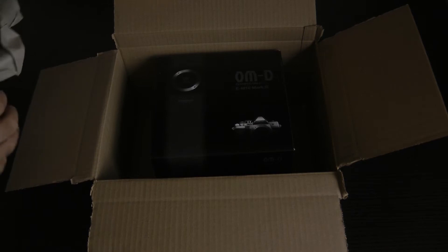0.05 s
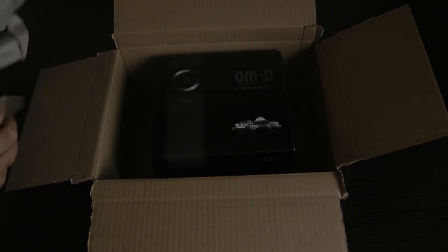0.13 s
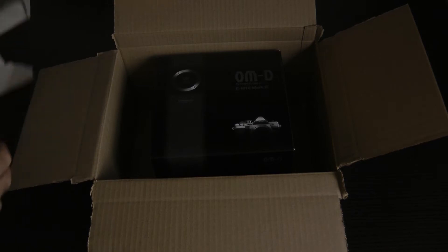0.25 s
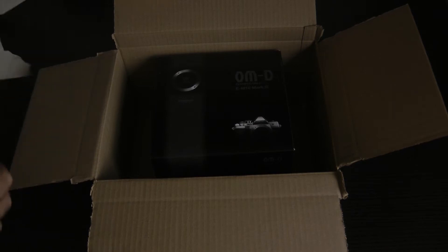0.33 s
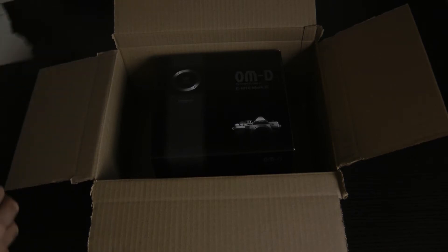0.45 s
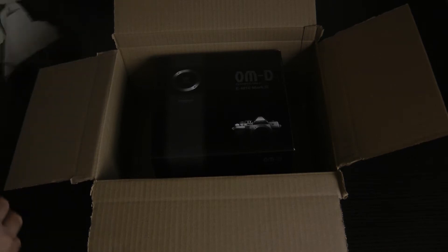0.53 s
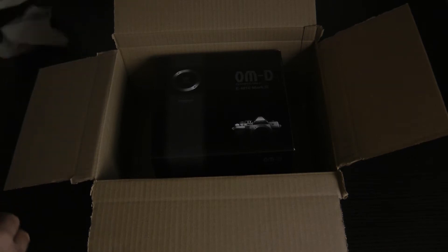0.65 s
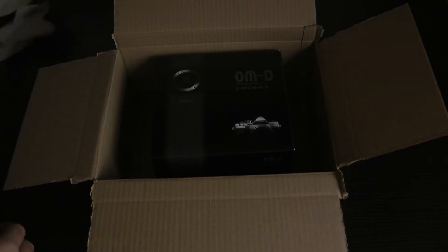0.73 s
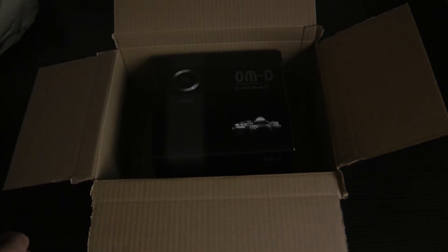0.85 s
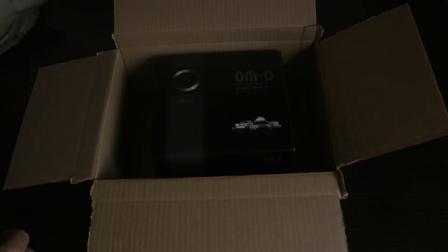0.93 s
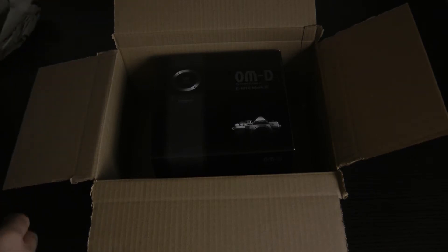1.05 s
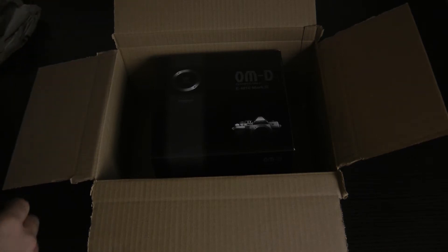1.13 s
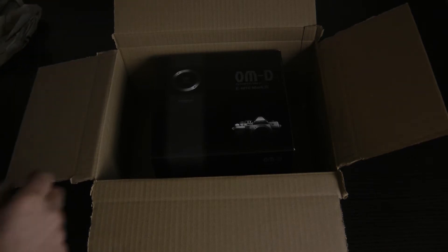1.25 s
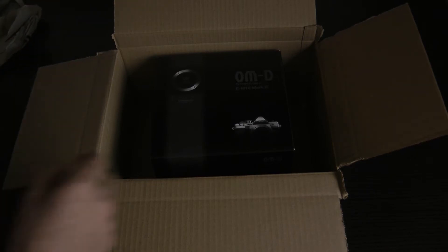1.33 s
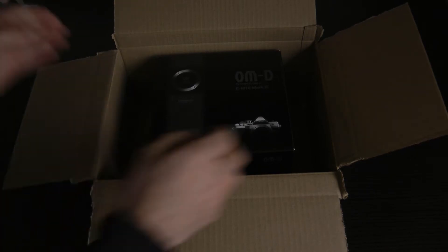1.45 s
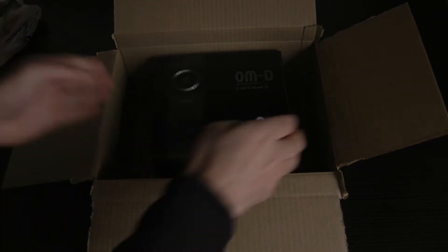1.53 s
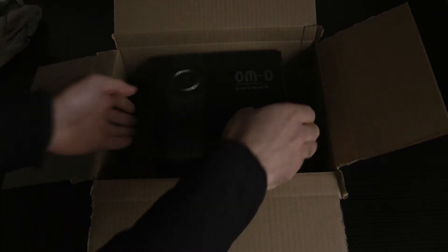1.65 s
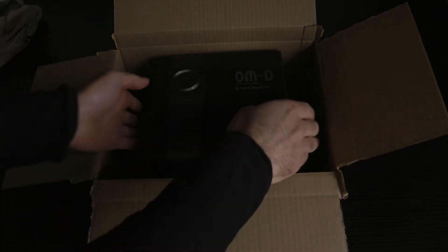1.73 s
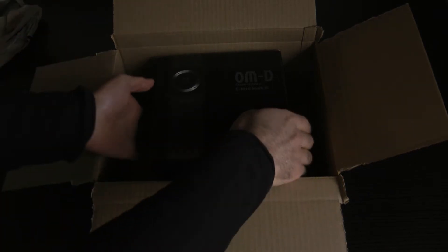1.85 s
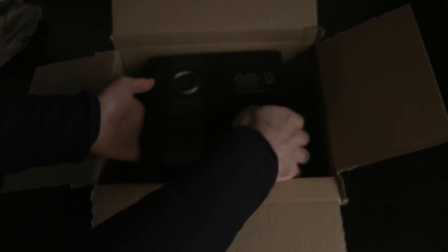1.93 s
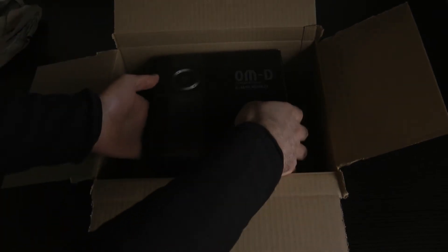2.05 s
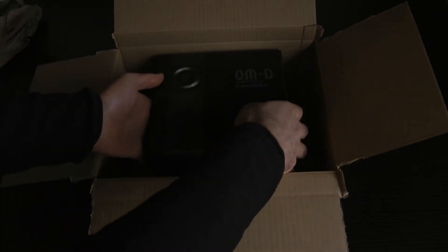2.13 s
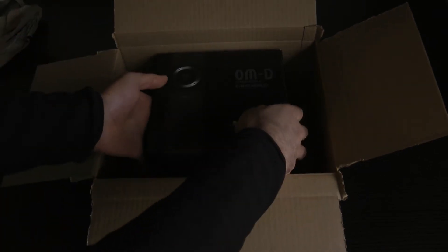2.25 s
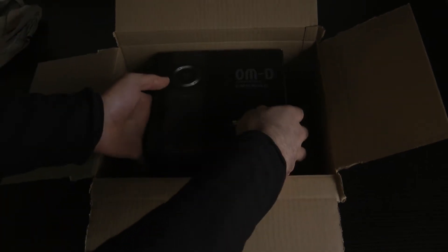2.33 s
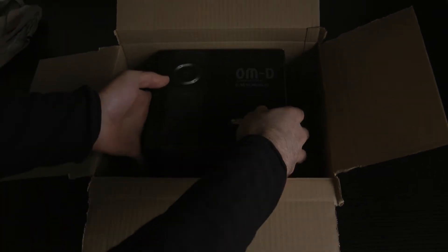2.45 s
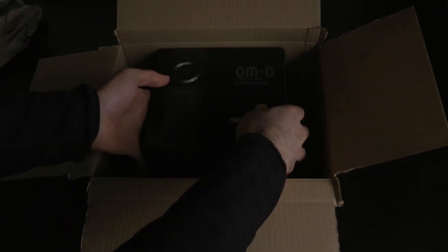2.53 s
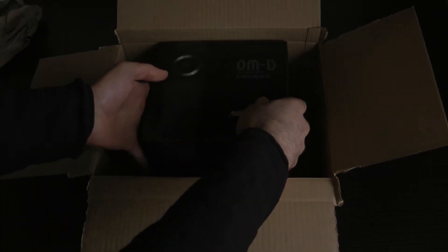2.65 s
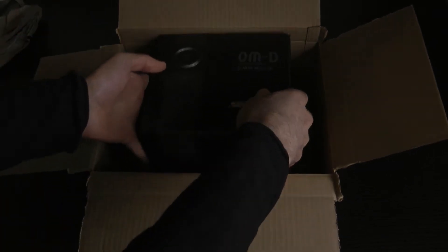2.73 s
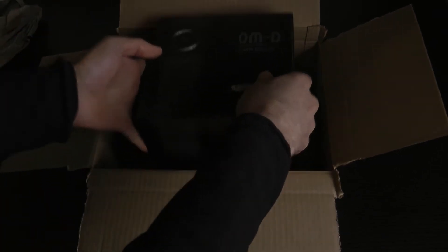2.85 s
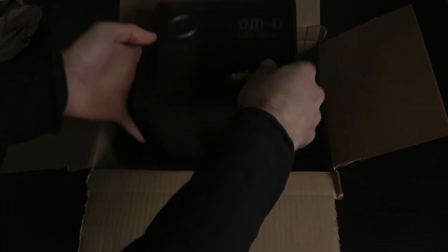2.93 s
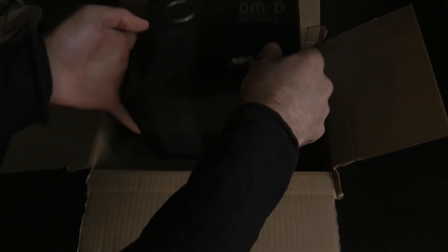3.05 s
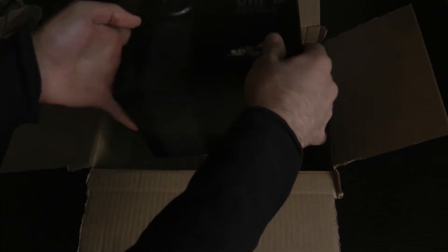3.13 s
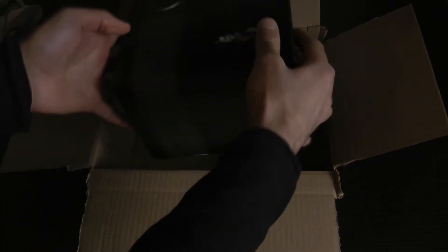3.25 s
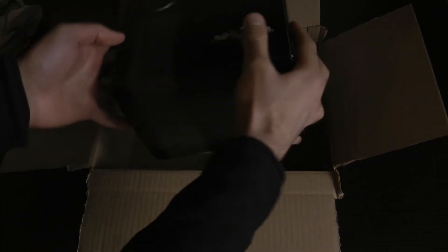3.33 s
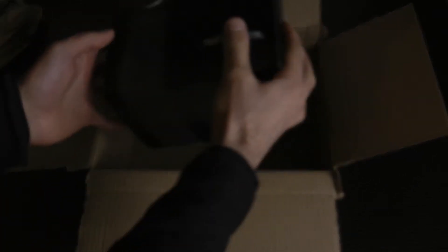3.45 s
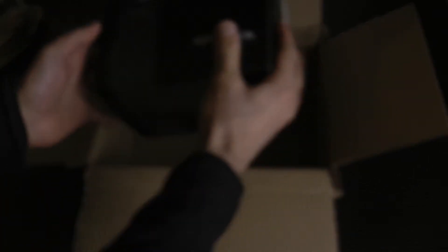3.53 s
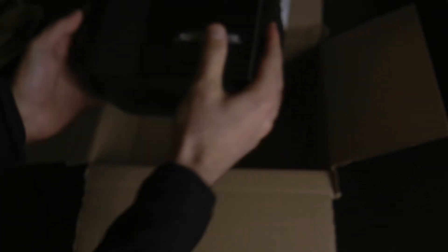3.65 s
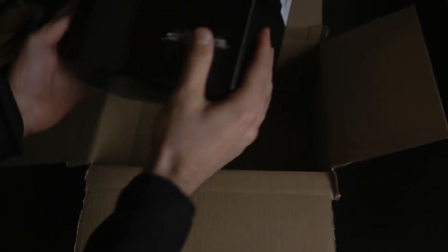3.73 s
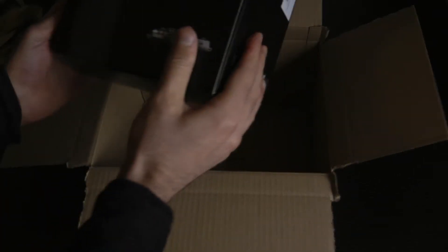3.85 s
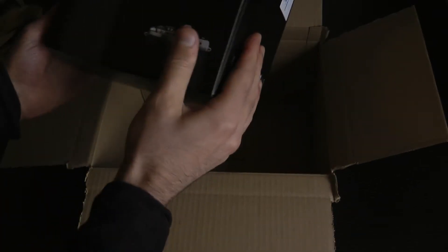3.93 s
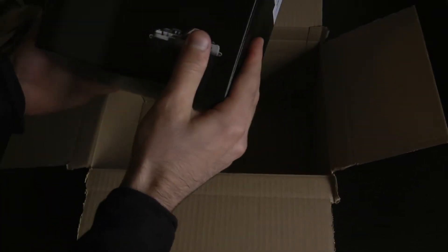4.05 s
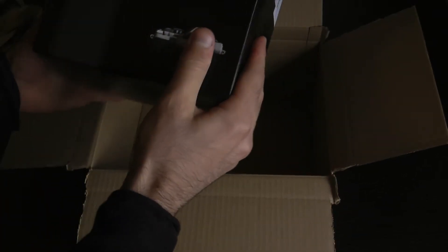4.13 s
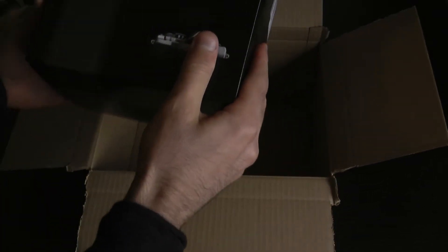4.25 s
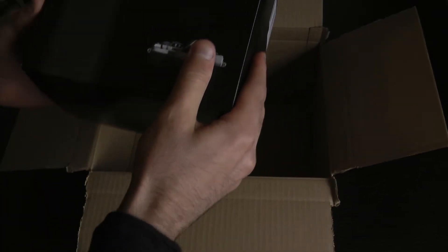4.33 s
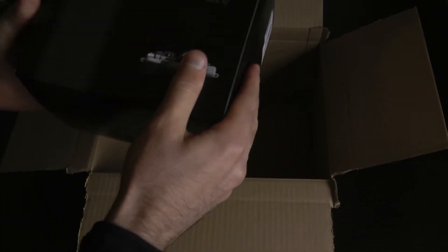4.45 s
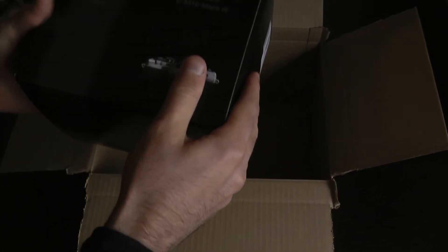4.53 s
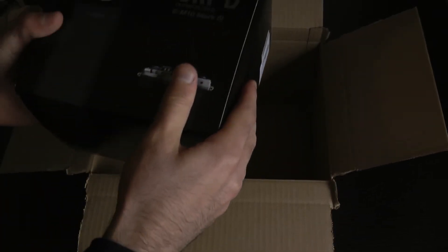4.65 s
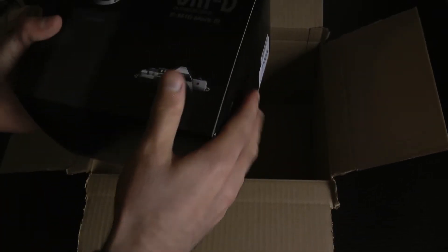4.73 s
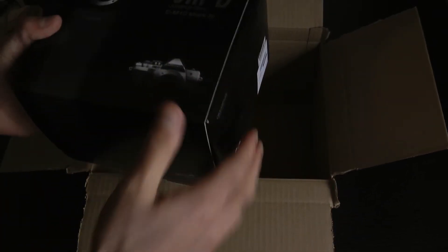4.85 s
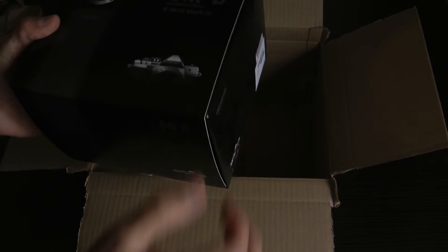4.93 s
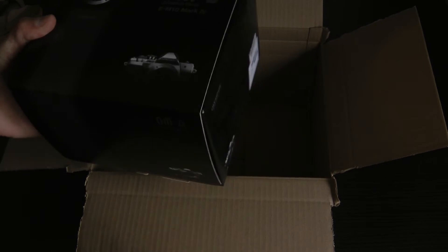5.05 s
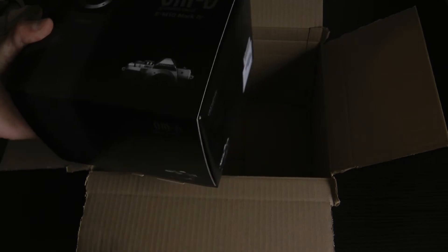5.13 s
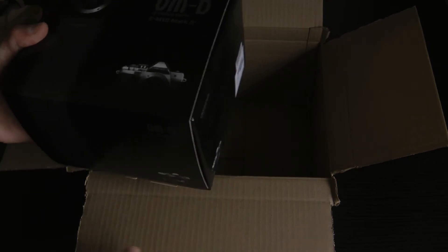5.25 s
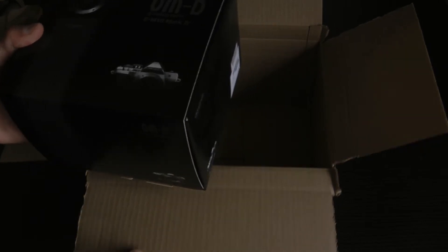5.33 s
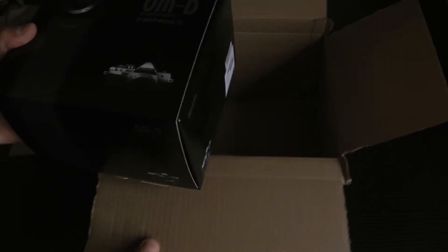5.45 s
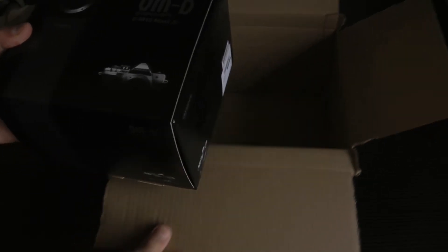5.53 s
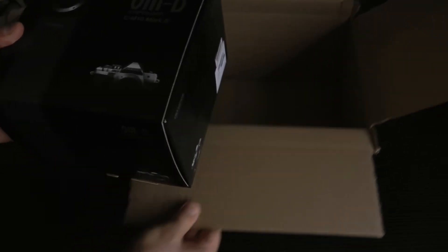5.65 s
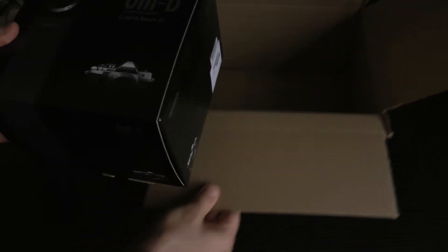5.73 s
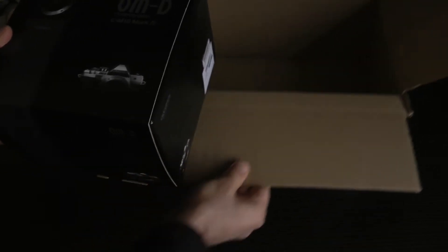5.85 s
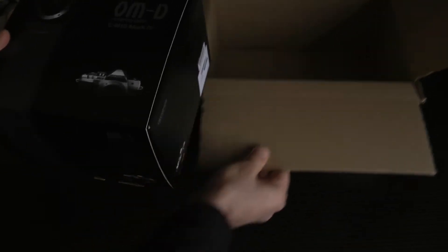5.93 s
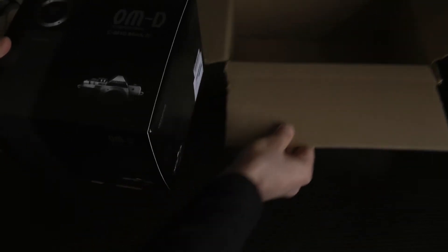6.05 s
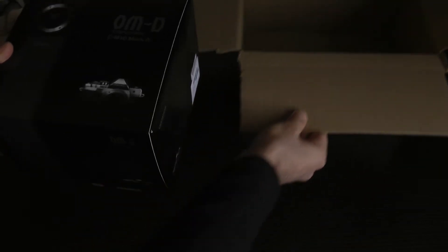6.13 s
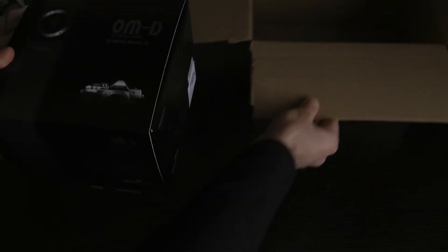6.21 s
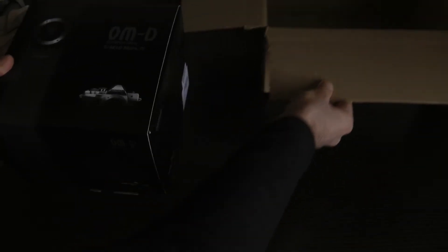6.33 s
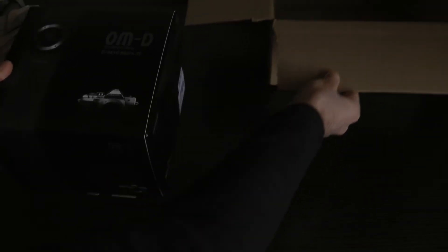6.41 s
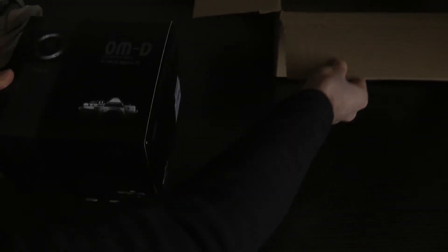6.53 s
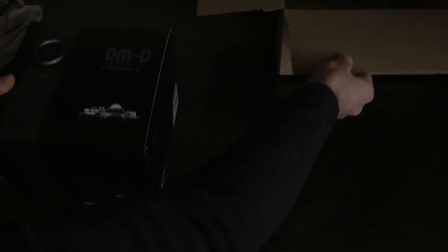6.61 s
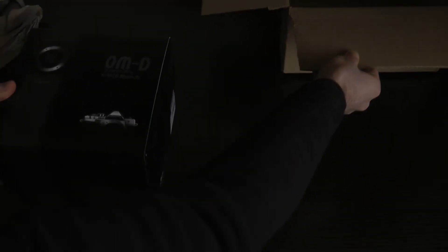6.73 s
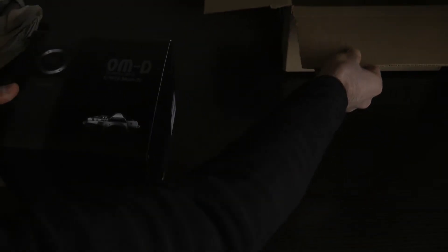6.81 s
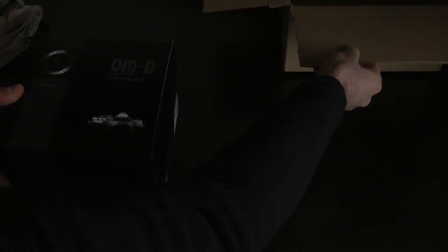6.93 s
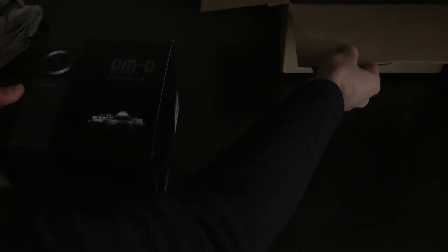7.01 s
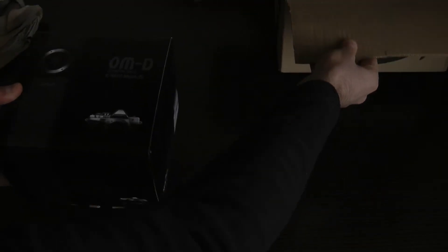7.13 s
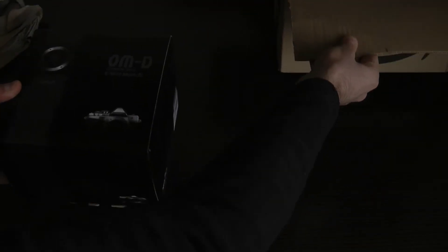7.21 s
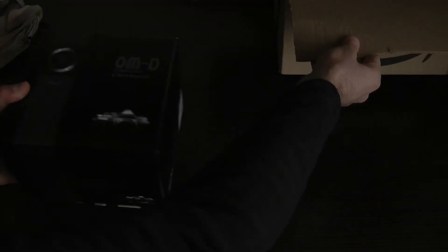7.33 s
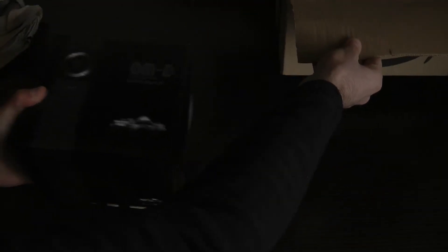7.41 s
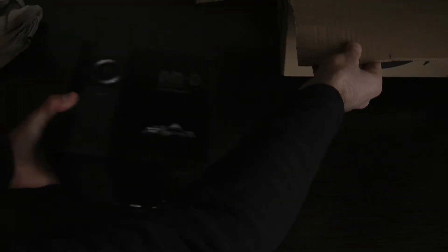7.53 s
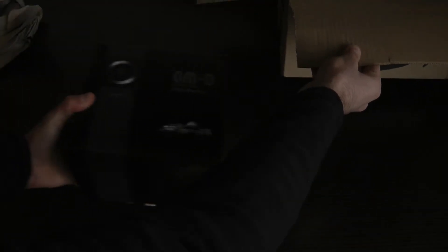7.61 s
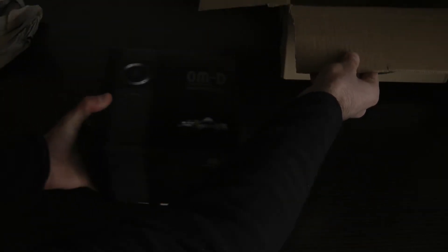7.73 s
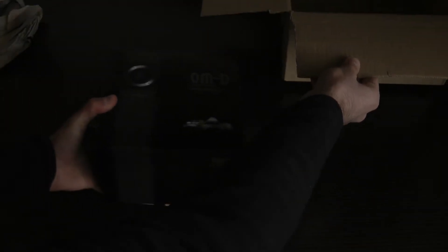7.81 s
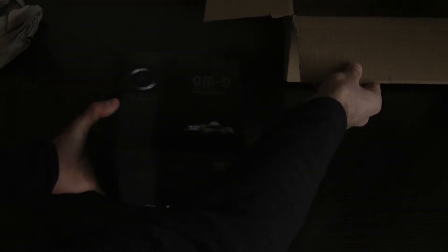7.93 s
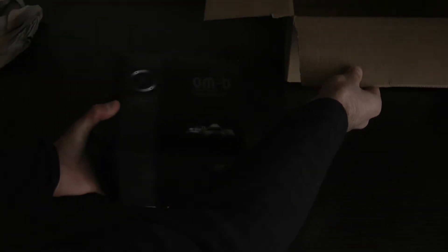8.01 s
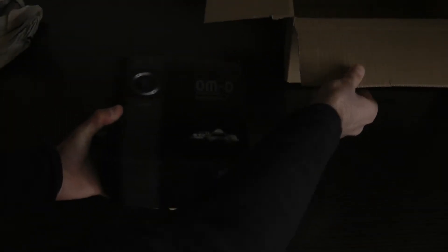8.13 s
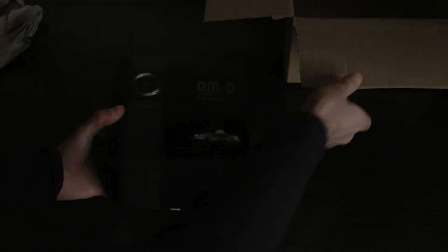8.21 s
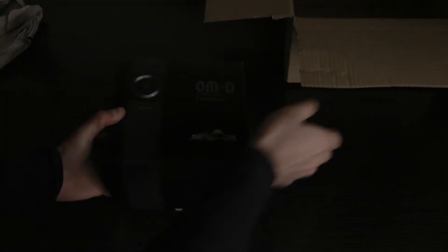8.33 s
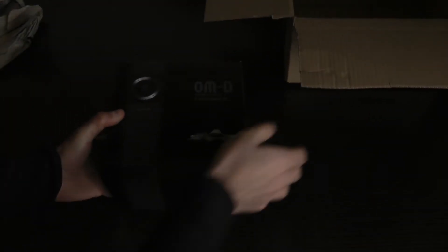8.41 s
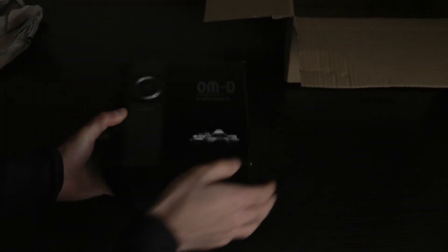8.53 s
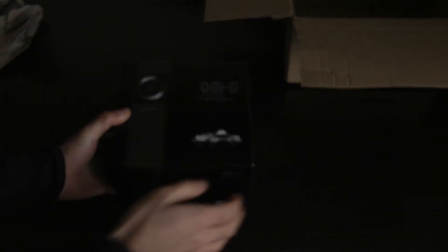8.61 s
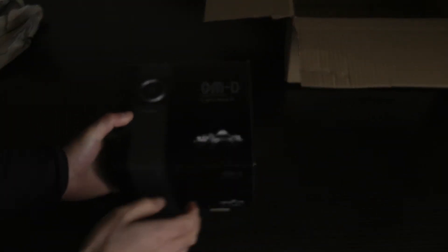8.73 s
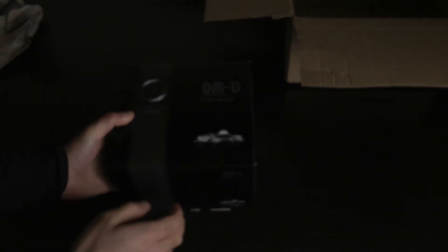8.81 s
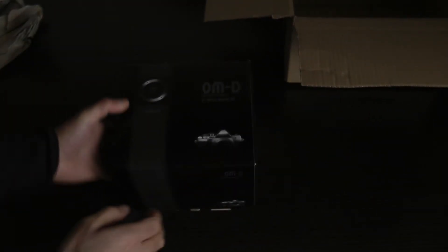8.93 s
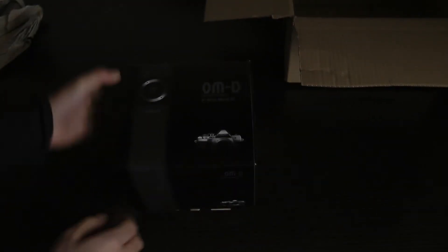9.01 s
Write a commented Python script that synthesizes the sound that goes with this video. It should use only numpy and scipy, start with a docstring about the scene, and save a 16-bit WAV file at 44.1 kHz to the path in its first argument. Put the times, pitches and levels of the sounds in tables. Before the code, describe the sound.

Close, dry paper crinkling gives way to hollow cardboard bumps and soft rubbing, a raspy box drag, then light taps as the carton is set down.

```python
"""On a table in a small furnished room, close under a mono camera microphone: packing paper is crumpled aside,
a carton is lifted out of a cardboard shipping box, the empty box is dragged and the carton is set down. Rubbing
is dense noise grains that hiss and rasp through resonances and drum on the panels; creases crack as decaying
bursts, corners knock as ringing panel modes, and a low boom near 140 Hz swells and rings on at the heavier
moments."""
import sys
import numpy as np
from scipy import signal
from scipy.fft import rfft, irfft, next_fast_len
from scipy.io import wavfile
from scipy.ndimage import uniform_filter1d, map_coordinates

SR = 44100
rng = np.random.default_rng(int(sys.argv[2]) if len(sys.argv) > 2 else 0)


def waveform_to_disk(signal):
    """Save audio, clipped to [-1, 1], as 16-bit WAV at the path in sys.argv[1]."""
    frames = np.transpose(np.atleast_2d(signal))
    scaled = np.clip(frames, -1, 1) * 32767
    samples = np.round(scaled).astype(np.int16)
    wavfile.write(sys.argv[1], SR, samples)


N = 399987  # samples, about 9.07 s

# spectrum of the quiet room: [pitch_hz, gain_db]
ROOM_TONE_SPECTRUM = [(30, -7), (130, 1), (320, -2), (800, -24), (2000, 1), (7000, -6.5), (13000, -8),
                      (16000, -9)]
ROOM_TONE_DB = -73
# how long the room rings: [pitch_hz, t60_s]
ROOM_DECAY = [(200, 0.34), (2000, 0.19), (10000, 0.076)]
ROOM_DB, ROOM_DELAY = -8.5, 200  # reflections of the hits: level, delay in samples
# low electrical flicker of the preamp: [pitch_hz, gain_db]
PREAMP_SPECTRUM = [(20, -1), (200, -4), (1000, -50)]
PREAMP_DB = -100
# response of the microphone: [pitch_hz, gain_db]
MIC_RESPONSE = [(20, -19), (100, -19.5), (140, -16.5), (300, -1.5), (1800, 1), (16000, 2)]
# reflections in the camera housing: [pitch_hz, width_hz, gain_db]
HOUSING_REFLECTIONS = [(947, 96, -12), (1283, 13.7, -33), (1582, 63, -9.5), (3184, 54, -2.5),
                       (8634, 2040, -12), (9716, 1550, 9.5)]
TOP_HZ = 15800  # nothing is heard above this

# spectrum of the low boom: [pitch_hz, gain_db]
BOOM_SPECTRUM = [(30, -28), (80, -22), (110, -9), (138, 2.5), (165, -5.5), (215, 1.5), (270, -19),
                 (400, -58.5)]
# swells of the low boom: [full_s, level_db]
BOOM_SWELLS = [(.2, -74), (.48, -73), (.71, -71), (1.24, -72), (2.0, -62), (2.52, -67), (2.68, -68),
               (2.86, -70), (2.97, -64), (3.21, -57), (3.39, -62), (3.55, -42.5), (3.78, -61), (4.1, -51.5),
               (4.43, -65), (4.63, -60), (4.84, -65), (5.38, -53.5), (5.47, -65), (6.42, -48), (6.48, -48),
               (6.67, -57), (7.03, -68), (7.21, -56.5), (7.42, -62.5), (8.28, -64), (8.77, -57.5)]
THUD_RISE_S, THUD_HOLD_S, THUD_T60_S, BOOM_REST_DB = 0.03, 0.025, 0.46, -75.5

# corners and panels struck: [start_s, level_db, pitch_hz, t60_s]
CORNER_KNOCKS = [(0.395, -39, 389, 0.12), (0.596, -49.5, 464, 0.14), (0.702, -35, 399, 0.041),
                 (0.853, -40, 566, 0.05), (0.982, -41.5, 565, 0.042), (1.162, -41.5, 583, 0.058),
                 (1.345, -44, 550, 0.064), (1.888, -44.5, 367, 0.07), (1.998, -44.5, 431, 0.06),
                 (2.462, -50, 420, 0.087), (2.577, -48, 326, 0.12), (2.648, -34.5, 430, 0.081),
                 (2.692, -33.5, 327, 0.063), (2.707, -38, 406, 0.049), (2.852, -51, 390, 0.032),
                 (2.975, -32.5, 357, 0.047), (3.209, -39.5, 385, 0.032), (3.219, -31.5, 304, 0.057),
                 (3.325, -32, 412, 0.043), (3.355, -48, 410, 0.034), (3.386, -48, 418, 0.056),
                 (3.417, -33, 422, 0.087), (3.524, -40, 336, 0.033), (3.551, -19.5, 340, 0.022),
                 (3.573, -24, 396, 0.015), (3.776, -40.5, 451, 0.045), (3.853, -41.5, 373, 0.091),
                 (3.944, -37, 427, 0.068), (4.068, -41, 356, 0.11), (4.106, -30, 323, 0.12),
                 (4.384, -42.5, 332, 0.033), (4.436, -26, 288, 0.035), (4.535, -52, 570, 0.075),
                 (4.621, -34, 320, 0.038), (4.739, -59, 363, 0.061), (4.787, -36.5, 444, 0.048),
                 (4.815, -37, 339, 0.12), (4.918, -46, 348, 0.051), (5.286, -54, 570, 0.076),
                 (5.381, -37, 445, 0.07), (5.405, -40.5, 383, 0.061), (5.602, -41.5, 400, 0.04),
                 (5.752, -47, 414, 0.062), (5.928, -50, 425, 0.039), (6.336, -42, 420, 0.048),
                 (6.418, -41, 393, 0.1), (6.476, -33, 339, 0.049), (6.499, -45, 360, 0.058),
                 (6.618, -37, 568, 0.032), (6.996, -42, 443, 0.039), (7.217, -44, 392, 0.089),
                 (7.513, -50, 394, 0.2), (7.915, -46, 555, 0.08), (7.939, -44, 393, 0.044),
                 (8.089, -51, 417, 0.077), (8.207, -50, 440, 0.18), (8.243, -38, 324, 0.099),
                 (8.287, -41, 436, 0.12), (8.765, -27, 434, 0.096)]
# ringing modes of the cardboard panels: [pitch_hz, level_db]
PANEL_MODES = [(222, -11), (270, 0), (305, 0.5), (345, 7.5), (400, 1), (450, -2.5), (510, -1.5), (575, 7.5),
               (670, 2.5), (760, -1.5)]
# short crunchy strokes of an edge: [start_s, length_s, level_db, pitch_hz]
EDGE_SCUFFS = [(0.084, 0.021, -46.5, 4500), (2.65, 0.12, -66.5, 2640), (3.214, 0.014, -59, 1430),
               (3.317, 0.099, -65, 2050), (3.556, 0.024, -45.5, 4030), (3.864, 0.0036, -47, 1960),
               (4.124, 0.064, -55.5, 3500), (4.44, 0.087, -67, 4270), (5.367, 0.15, -59.5, 1920),
               (6.626, 0.056, -58, 2270), (6.67, 0.012, -61, 4800)]
# creases and edges letting go: [start_s, level_db, fizz_above_level_db, pitch_hz, t60_s]
CREASE_CRACKS = [(0.0863, -29, 1, 2160, 0.16), (0.144, -39, 1, 3630, 0.063),
                 (0.2234, -34.5, -1, 4200, 0.069), (0.2745, -37.5, -1, 2250, 0.084),
                 (0.318, -44, 1, 4360, 0.055), (0.396, -35.5, -27, 1710, 0.041),
                 (0.4247, -40, -15, 3420, 0.064), (0.597, -37, -1.5, 4370, 0.076),
                 (0.6993, -35.5, 0.5, 3500, 0.072), (0.9462, -22.5, -12, 4980, 0.03),
                 (0.9671, -33, -3, 4750, 0.049), (0.995, -32, -8, 2160, 0.074),
                 (1.1478, -42, 2.5, 2870, 0.072), (1.2381, -36, -5, 1926, 0.079),
                 (1.3458, -35, 0.5, 2210, 0.055), (1.419, -48, 8, 2060, 0.055),
                 (1.878, -38, -23, 1820, 0.063), (1.9892, -44.5, -6, 1430, 0.06),
                 (2.147, -37.5, -6, 3100, 0.038), (2.4798, -37, -3, 1370, 0.074),
                 (2.6464, -48.5, 9, 1400, 0.055), (2.8481, -42.5, -16, 2140, 0.049),
                 (2.9746, -55, 1, 1840, 0.067), (3.2103, -39.5, -10, 1410, 0.041),
                 (3.3236, -38.5, -9, 2520, 0.065), (3.3752, -45, -2, 2600, 0.055),
                 (3.414, -43, -9, 1410, 0.045), (3.5269, -45, -5, 1680, 0.055),
                 (3.6936, -48.5, -18, 1980, 0.055), (3.7755, -44, -2, 2010, 0.062),
                 (3.8651, -47, -5, 2060, 0.048), (3.922, -42, -11, 2680, 0.055),
                 (3.9417, -41, -3, 2100, 0.06), (4.0655, -40, -15, 2010, 0.072),
                 (4.1014, -34, -4.5, 1390, 0.055), (4.133, -25.5, -3, 3500, 0.048),
                 (4.386, -50, -3, 3380, 0.075), (4.4363, -19, -4, 3940, 0.026),
                 (4.5302, -41, -2, 4100, 0.038), (4.619, -41.5, -28, 2230, 0.04),
                 (4.7102, -50, -21, 1930, 0.055), (4.7451, -41.5, -1.5, 2520, 0.07),
                 (4.789, -37.5, -20, 1350, 0.038), (4.8162, -33.5, -20, 2080, 0.031),
                 (4.9173, -48.5, -17, 1930, 0.047), (5.2904, -56.5, 3, 1970, 0.055),
                 (5.331, -48, -8.5, 1460, 0.055), (5.3806, -41.5, -1, 2180, 0.072),
                 (5.404, -43, -5, 1880, 0.047), (5.6028, -35.5, -5, 4670, 0.061),
                 (5.7056, -26, -4.5, 4630, 0.082), (5.7167, -34, -8.5, 4490, 0.055),
                 (5.7368, -29.5, -3, 3700, 0.11), (5.7757, -31.5, -3, 3660, 0.055),
                 (5.9364, -30.5, -11, 3650, 0.07), (6.117, -34, -5, 2590, 0.055),
                 (6.1579, -35, -11, 4920, 0.06), (6.2958, -34.5, 4.5, 4870, 0.071),
                 (6.321, -30.5, 3, 3200, 0.17), (6.3382, -28.5, -5, 4100, 0.066),
                 (6.3725, -31, -1, 4840, 0.083), (6.4239, -28, -3, 3890, 0.075),
                 (6.611, -27.5, -3, 2220, 0.11), (6.674, -33, -7, 4700, 0.11),
                 (7.001, -39, 4.5, 2820, 0.098), (7.1223, -43, 1, 2800, 0.078),
                 (7.1908, -40, -1, 2900, 0.17), (7.91, -42.5, -14, 1980, 0.067),
                 (7.9386, -26.5, 1, 3400, 0.024), (8.051, -48.5, -2, 1810, 0.055),
                 (8.069, -60, -5, 2650, 0.055), (8.2048, -52, -9, 2440, 0.055),
                 (8.2267, -53, -9, 2240, 0.055), (8.2392, -46.5, -3, 1460, 0.055),
                 (8.2576, -48, -7, 2980, 0.049), (8.2883, -34, -7, 1780, 0.055),
                 (8.7244, -52, -2, 2070, 0.06), (8.767, -38.5, -5.5, 1920, 0.077),
                 (8.9052, -47, -25, 2010, 0.055)]
CRACK_RISE_S = 0.0011

# tone of the rasp, the high fizz and the panel drumming: [pitch_hz, gain_db] each
RASP_SPECTRUM = [(100, -72), (500, -5.5), (1000, -7), (2200, 0), (4500, -2), (7000, -4.5), (10000, -9.5)]
FIZZ_SPECTRUM = [(1000, -73), (4000, -70), (7000, -10), (9000, 2.5), (16000, -20)]
DRUM_SPECTRUM = [(60, -30.5), (130, -9), (200, 1.5), (450, 7), (800, -11.5), (1500, -13.5), (3000, -32.5)]
# bounds of the handling stages: paper twice, grip, lift, turn, drag twice, slide, nudge, set down, settle, end: [start_s]
STAGE_STARTS = [0, 0.751, 1.7, 3.0, 4.3, 5.35, 6.05, 6.561, 7.29, 7.66, 8.45, 9.07]
# one list a stage, resonances of the surfaces rubbed: [pitch_hz, half_width_hz, boost_db]
SURFACE_RESONANCES = [
    [(397, 24, 9.5), (574, 33, 13), (1400, 35, 2), (3000, 360, -1), (4260, 1100, 2.5)],
    [(406, 25, 3), (582, 17, 11), (1440, 40, 2), (2060, 83, 4.5), (4360, 160, 2)],
    [(320, 15, 4), (419, 16, 7), (1410, 54, 5.5), (1890, 110, 6.5)],
    [(295, 9.9, 8), (403, 19, -6), (1380, 44, 5), (2040, 68, 8.5), (2680, 59, 7.5), (3640, 530, 5)],
    [(308, 31, 1.5), (412, 15, -0.5), (560, 16, 0), (1410, 33, 8), (2080, 100, 9), (2860, 110, 12),
     (4170, 85, 10)],
    [(408, 16, 17), (562, 7.8, 11), (720, 13, 12.5), (1880, 47, 9), (2670, 64, 1), (3860, 520, 1.5),
     (4770, 1100, 7), (7450, 850, 10)],
    [(198, 30, 11), (381, 22, 24), (583, 15, 15), (2790, 110, 6), (3860, 520, 5.5), (4880, 290, 7),
     (7100, 760, 9.5)],
    [(215, 6.3, 7), (376, 27, 11), (459, 9.2, 14.5), (567, 26, 19), (718, 4, 19), (1190, 44, 11),
     (1440, 36, 5), (1980, 95, 5.5), (2870, 104, 10.5), (4770, 88, 4.5), (4990, 36, 11)],
    [(377, 37, 7), (457, 10, 11.5), (579, 17, 18), (2040, 150, 5.5), (2980, 400, 4.5)],
    [(324, 42, 5.5), (408, 14, 8.5), (588, 12, 1), (1400, 67, 3.5), (1920, 89, 5.5), (2920, 220, 7)],
    [(422, 24, 2), (563, 14, 8.5), (2040, 140, 8.5)],
]
# hands resting on the card: [rasp_db, fizz_db, drumming_db]
RESTING_HANDS = [-80, -79, -72]
# the empty box dragged over the table: [time_s, rasp_db, fizz_db, drumming_db]
BOX_DRAG = [(5.4, -69, -67, -61), (5.54, -55.5, -54.5, -69), (5.644, -50, -49.5, -70),
            (5.726, -46, -45, -50.5), (5.818, -45, -44, -52), (5.88, -46, -43.5, -51.5),
            (6.108, -47.5, -44.5, -57), (6.278, -44, -43, -54), (6.458, -46, -46.5, -50.5),
            (6.562, -50, -54, -57), (6.674, -53.5, -65, -49), (6.826, -52.5, -58, -53),
            (6.89, -52, -60, -50)]
STOP_T60_S = 0.23  # the drag dies away when the box stops
# strokes of paper, hands and carton: [start_s, swell_s, hold_s, fade_t60_s, rasp_db, fizz_db, drumming_db]
HAND_STROKES = [(0.001, 0.1, 0.015, 0.14, -45.5, -47, -50.5), (.12, .03, 0.026, 0.36, -45, -48.5, -52),
                (0.201, 0.023, 0.016, 0.26, -46, -51, -51.5),
                (0.304, 0.029, 0.021, 0.15, -50.5, -54, -57.5), (0.418, .012, 0.16, 0.49, -54, -54, -65),
                (0.695, 0.0033, 0.016, 0.69, -48.5, -50, -52.5), (0.73, .12, 0.11, .3, -47, -49, -58.5),
                (.86, 0.083, 0.059, .45, -45, -46, -58), (1.118, 0.03, .01, 0.49, -46, -51, -50.5),
                (1.216, 0.031, 0.013, 0.28, -54.5, -58, -50), (1.347, .01, 0.007, 0.37, -52.5, -55.5, -56),
                (1.414, 0.026, 0.007, .22, -49.5, -51, -55.5), (1.865, .025, 0.035, 0.7, -61.5, -57.5, -64),
                (1.96, 0.039, 0.018, .4, -64.5, -88, -55.5), (2.06, 0.033, 0.058, .3, -68, -71, -64.5),
                (2.142, 0.0036, .005, 0.19, -57, -66, -62), (2.2, .015, 0.0076, 0.11, -72, -80, -57.5),
                (2.183, 0.029, 0.33, .45, -71.5, -77, -66), (2.478, 0.0051, 0.024, 0.32, -58, -58, -61),
                (2.64, 0.015, 0.071, 0.15, -56, -49.5, -47), (2.846, 0.0078, 0.0079, 0.1, -67, -78, -50),
                (2.972, .012, 0.0081, 0.078, -60.5, -60, -53), (3.2, .006, 0.0071, .2, -62, -66, -61),
                (3.26, 0.038, .02, .3, -67, -62, -71), (3.314, 0.0055, 0.098, 0.47, -66, -65.5, -50.5),
                (3.491, .025, 0.012, .2, -64, -57, -53), (3.544, 0.0034, 0.024, 0.23, -56.5, -56.5, -41.5),
                (3.59, 0.0089, .05, 0.98, -65.5, -75, -55), (3.713, 0.089, 0.15, 0.74, -64, -62.5, -59),
                (3.9, 0.074, 0.017, 0.49, -58, -56, -73), (4.071, .025, 0.024, 0.24, -56, -63, -47.5),
                (4.177, 0.058, .02, 0.3, -58.5, -53.5, -66.5), (4.34, 0.034, 0.024, 0.13, -63, -64, -72),
                (4.433, 0.0023, 0.0081, 0.27, -56, -60, -62), (4.523, 0.0081, .005, 0.24, -61.5, -74, -57),
                (4.596, 0.024, .01, .25, -68, -81, -55.5), (4.707, 0.049, 0.085, 0.28, -64, -66, -51.5),
                (5.028, 0.025, 0.0084, 0.18, -75, -82, -66), (5.287, 0.0088, 0.053, .3, -81, -75, -66),
                (5.363, .02, .03, 0.6, -84, -66, -59), (6.595, .01, 0.033, 0.32, -48, -56, -43),
                (6.663, 0.0087, .01, 0.16, -47, -59, -53), (6.969, 0.024, 0.044, 0.68, -53, -57, -56),
                (7.07, 0.062, 0.032, 0.27, -51.5, -51, -56), (7.166, .03, 0.041, 0.31, -52.5, -57.5, -49.5),
                (7.294, .04, 0.096, 0.56, -64.5, -65, -55), (7.469, 0.049, 0.04, 0.57, -61.5, -63.5, -54),
                (7.674, 0.11, 0.18, .3, -65.5, -66.5, -65.5), (7.929, 0.006, 0.012, 0.5, -57.5, -61, -55),
                (8.018, 0.014, 0.022, 0.33, -72.5, -83, -61.5),
                (8.073, 0.028, 0.044, 0.41, -81, -87, -60.5),
                (8.167, 0.049, 0.018, 0.25, -70.5, -86, -52.5), (8.281, 0.0027, .01, 0.26, -57, -58, -44),
                (8.301, 0.073, 0.028, 0.2, -61.5, -62.5, -58.5), (8.423, 0.013, 0.024, 0.31, -77, -87, -62),
                (8.482, .006, .004, 0.059, -78, -84, -59), (8.547, .06, 0.16, .4, -68.5, -75, -70),
                (8.715, 0.057, 0.0077, 0.22, -58.5, -71, -49.5),
                (8.896, 0.0063, 0.032, 0.16, -68.5, -70, -58.5)]
SWELL_DB = 16  # a stroke starts this far under its level


def amp(db):
    """Gain of a dB value."""
    return 10 ** (np.asarray(db) / 20)


def unit(x):
    """Scaled to rms 1."""
    return x / np.sqrt(np.mean(x ** 2) + 1e-20)


def along(points, hz):
    """Rows of (pitch_hz, value) read on a log frequency axis."""
    point_hz, values = np.transpose(points)
    return np.interp(np.log(hz + 1), np.log(point_hz + 1), values)


def curves(rows):
    """One value per sample for each column after the time."""
    time_s, *columns = np.transpose(rows)
    return [np.interp(np.arange(N) / SR, time_s, column) for column in columns]


def wobble(rate):
    """A smooth random curve, rate knots a second."""
    knots = rng.standard_normal(int(N * rate / SR) + 4)
    return map_coordinates(knots, [np.arange(N) * rate / SR])


def coloured(x, db_of):
    """x through a causal minimum-phase filter with the gain db_of(hz)."""
    m = 2 * next_fast_len(N // 2 + 8192)
    cepstrum = irfft(np.log(amp(db_of(np.fft.rfftfreq(m, 1 / SR)))), m)
    # folding the cepstrum forward makes the filter ring only after its input
    cepstrum[1:m // 2] *= 2
    cepstrum[m // 2 + 1:] = 0
    return irfft(rfft(x, m) * np.exp(rfft(cepstrum)), m)[:N]


def shaped(x, spectrum):
    """x through the gains of a spectrum table."""
    return coloured(x, lambda hz: along(spectrum, hz))


def noise(spectrum):
    """Steady noise of rms 1 with the given spectrum."""
    return unit(shaped(rng.standard_normal(N), spectrum))


def stroke(start, swell, hold, t60):
    """Gain that swells, holds and fades."""
    t = np.arange(N) / SR - start
    swell_db = -SWELL_DB * np.maximum(1 - t / swell, 0)
    fade_db = -60 * np.maximum(t - swell - hold, 0) / t60
    return (t > 0) * amp(swell_db + fade_db)


def room_tone():
    """The quiet room is steady coloured noise."""
    return amp(ROOM_TONE_DB) * noise(ROOM_TONE_SPECTRUM)


def room(x):
    """A small furnished room; every third of a second meets a new pattern of decaying reflections."""
    out, step = np.zeros(N + SR), SR // 3
    for a in range(0, N, step):
        hz, t, z = signal.stft(rng.standard_normal(SR // 2), SR, nperseg=256)
        decay = amp(-60 * t / along(ROOM_DECAY, hz)[:, None])
        tail = signal.istft(z * decay, SR, nperseg=256)[1]
        wet = signal.fftconvolve(x[a:a + step], tail / np.linalg.norm(tail))
        out[a + ROOM_DELAY:][:len(wet)] += wet
    return out[:N]


def low_boom():
    """A low boom near 140 Hz is noise that swells and fades at each listed moment, over a faint steady rest."""
    gain = amp(BOOM_REST_DB)
    for full_s, db in BOOM_SWELLS:
        gain = gain + amp(db) * stroke(full_s - THUD_RISE_S, THUD_RISE_S, THUD_HOLD_S, THUD_T60_S)
    return gain * noise(BOOM_SPECTRUM)


def knocks():
    """Each blow is a thump of a few cycles, and rings the panel modes near its pitch most, at new strengths."""
    out, t = np.zeros(N + SR), np.arange(SR // 3) / SR
    hz, mode_db = np.transpose(PANEL_MODES)[:, :, None]
    for s, db, pitch, t60 in CORNER_KNOCKS:
        octaves_off = np.abs(np.log2(hz / pitch))
        share = amp(mode_db - 7.8 * octaves_off + rng.normal(0, 6.2, hz.shape))
        modes = np.sin(2 * np.pi * hz * t + rng.uniform(0, 2 * np.pi, hz.shape))
        ring = amp(-60 * t / t60) * (share * modes).sum(axis=0) / share.sum()
        thump = t / 0.0043 * np.exp(1 - t / 0.003) * np.sin(2 * np.pi * pitch * t)
        onset = 1 - np.exp(-t / 0.00047)
        out[round(s * SR):][:len(t)] += amp(db) * onset * (thump + 1.45 * ring)
    return out[:N]


def grains(spread_db, lumpy_db):
    """Dense slips of uneven size, arriving in clumps."""
    uneven_db = spread_db * np.minimum(rng.exponential(size=N), 6)
    clumps_db = lumpy_db * (wobble(30) + wobble(140))
    return unit(amp(uneven_db + clumps_db) * rng.standard_normal(N))


def scuffs():
    """Lumpy slips for the length of the stroke, through one resonance of the edge."""
    out, t = np.zeros(N + SR), np.arange(SR // 3) / SR
    slips = grains(spread_db=3, lumpy_db=1.5)
    for s, length, db, hz in EDGE_SCUFFS:
        shape = np.minimum(t / 0.002, 1) * amp(-60 * np.maximum(t - length, 0) / 0.017)
        ring = signal.lfilter(*signal.iirpeak(hz, 4.5, SR), slips[round(s * SR):][:len(t)])
        out[round(s * SR):][:len(t)] += amp(db) * shape * unit(ring)
    return out[:N]


def cracks():
    """A burst that swells for its rise time and dies away as noise, ringing at its own pitch."""
    rasp, fizz, t = np.zeros(N + SR), np.zeros(N + SR), np.arange(SR // 4) / SR
    rise, late = np.minimum(t / CRACK_RISE_S, 1), np.maximum(t - CRACK_RISE_S, 0)
    for s, db, fizz_db, hz, t60 in CREASE_CRACKS:
        snap = amp(-60 * late / 0.015)
        rattle = 0.5 * amp(-60 * late / t60)
        burst = rise * (snap + rattle) * rng.standard_normal(len(t))
        ring = signal.lfilter(*signal.iirpeak(hz, 3.5, SR), burst)
        rasp[round(s * SR):][:len(t)] += amp(db) * (0.47 * burst + 0.69 * ring)
        fizz[round(s * SR):][:len(t)] += amp(db + fizz_db) * burst
    return shaped(rasp[:N], RASP_SPECTRUM) + shaped(fizz[:N], FIZZ_SPECTRUM)


def in_stages(x):
    """Each stage of the handling colours x with the resonances of the surfaces in contact, at rms 1."""
    out = np.zeros(N)
    for start, end, peaks in zip(STAGE_STARTS, STAGE_STARTS[1:], SURFACE_RESONANCES):
        part = slice(round(start * SR), round(end * SR))
        length = len(x[part])
        m = next_fast_len(length)
        hz = np.fft.rfftfreq(m, 1 / SR)
        boost = 1 + sum((amp(db) - 1) / (1 + ((hz - c) / w) ** 2) for c, w, db in peaks)
        out[part] = unit(irfft(rfft(x[part], m) * boost, m)[:length])
    return out


def drumming(gain):
    """Rough sliding keeps the panels muttering: low grains through the surface resonances."""
    return gain * in_stages(shaped(grains(spread_db=1, lumpy_db=0.8), DRUM_SPECTRUM))


def patchy(x, depth_db):
    """The contact spot wanders, so narrow bands swell and fade for a while."""
    z = signal.stft(x, nperseg=512)[2]
    across_bands = uniform_filter1d(rng.standard_normal(z.shape), size=3, axis=0)
    field = uniform_filter1d(across_bands, size=20, axis=1)  # smooth in time
    return signal.istft(z * amp(depth_db * unit(field)), nperseg=512)[1][:N]


def rubbing(rasp_gain, fizz_gain):
    """One stream of slips rasps through the resonances of the surfaces in contact, and fizzes."""
    slips = patchy(grains(spread_db=2.0, lumpy_db=1.3), depth_db=1.8)
    rasp = in_stages(shaped(slips, RASP_SPECTRUM))
    fizz = unit(shaped(slips, FIZZ_SPECTRUM))
    return rasp_gain * rasp + fizz_gain * fizz


def contact():
    """Gains of rasp, fizz and drumming: strokes, the drag and resting hands add in power."""
    t = np.arange(N) / SR
    drag_start, drag_end = BOX_DRAG[0][0], BOX_DRAG[-1][0]
    dragging = (t > drag_start) * amp(-60 * np.maximum(t - drag_end, 0) / STOP_T60_S)
    power = amp(RESTING_HANDS)[:, None] ** 2 + (dragging * amp(curves(BOX_DRAG))) ** 2
    for start, swell, hold, t60, *db in HAND_STROKES:
        power = power + np.outer(amp(db) ** 2, stroke(start, swell, hold, t60) ** 2)
    return np.sqrt(power)


def scene():
    """Everything reaches one microphone, so both channels agree; only the hits excite the room."""
    hits = cracks() + scuffs() + knocks()
    rasp, fizz, drum = contact()
    background = room_tone() + amp(ROOM_DB) * room(hits) + low_boom()
    handling = drumming(drum) + rubbing(rasp, fizz)
    return np.tile(background + hits + handling, (2, 1))


def record(dry):
    """The microphone cuts bass, its housing adds notches and a presence peak; then the band limit."""
    def colour(hz):
        housing = sum(db * np.exp(-((hz - c) / w) ** 2) for c, w, db in HOUSING_REFLECTIONS)
        return along(MIC_RESPONSE, hz) + housing

    heard = rfft(coloured(dry[0], colour) + amp(PREAMP_DB) * noise(PREAMP_SPECTRUM))
    in_band = np.fft.rfftfreq(N, 1 / SR) < TOP_HZ
    return np.tile(irfft(heard * in_band, N), (2, 1))


dry = scene()
out = record(dry)
waveform_to_disk(out)
```